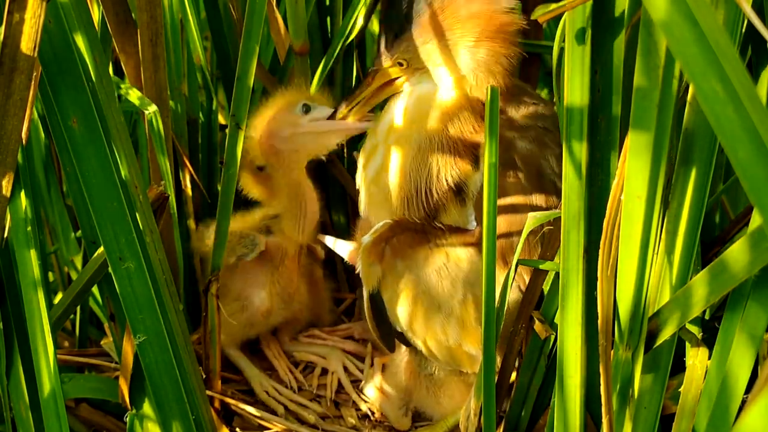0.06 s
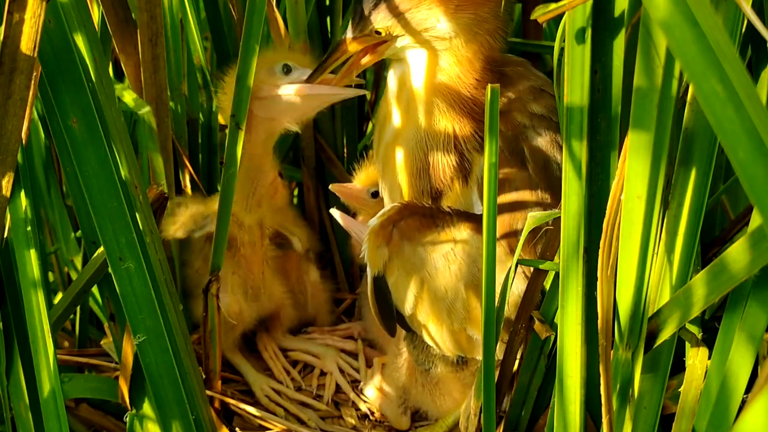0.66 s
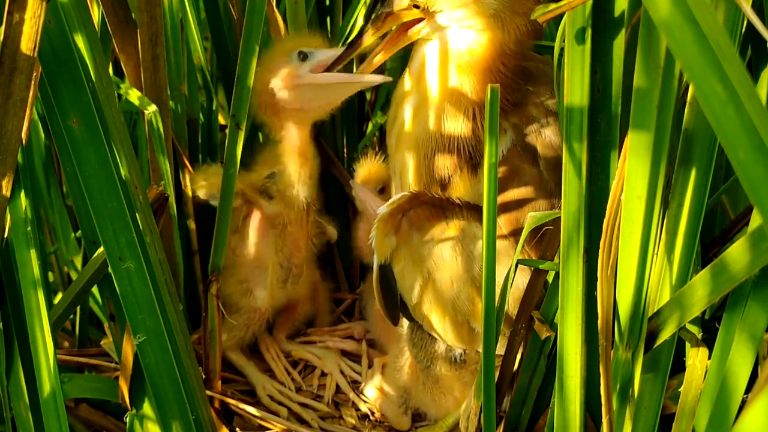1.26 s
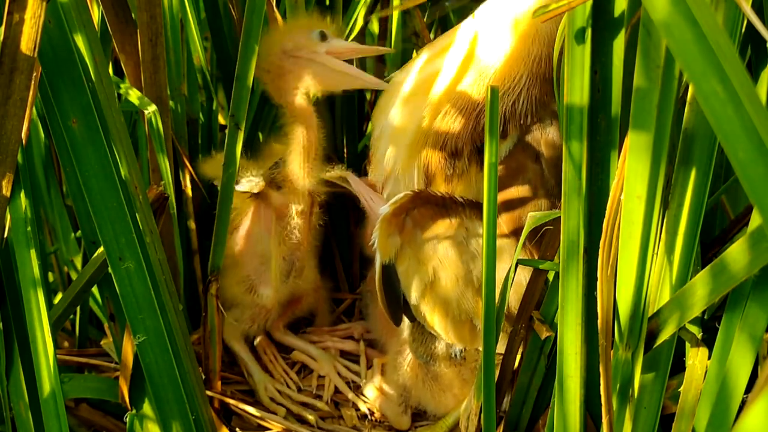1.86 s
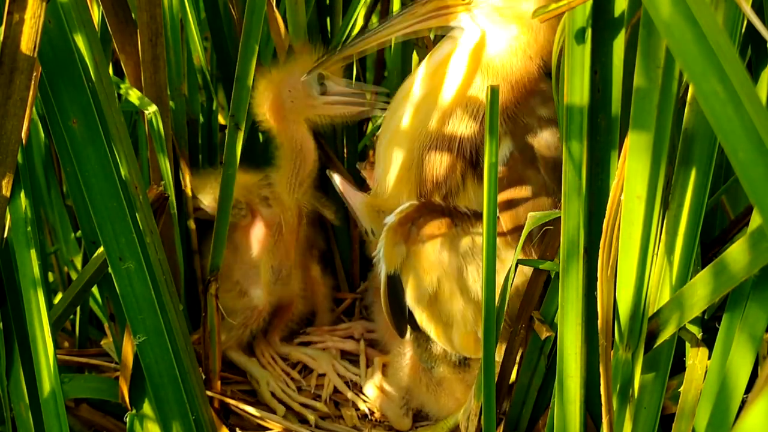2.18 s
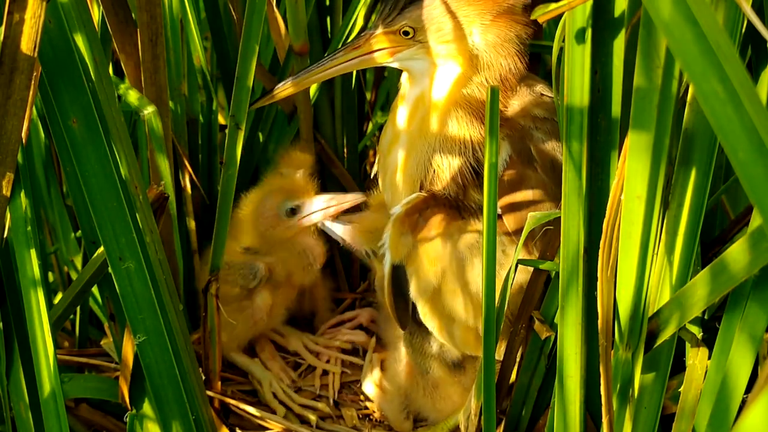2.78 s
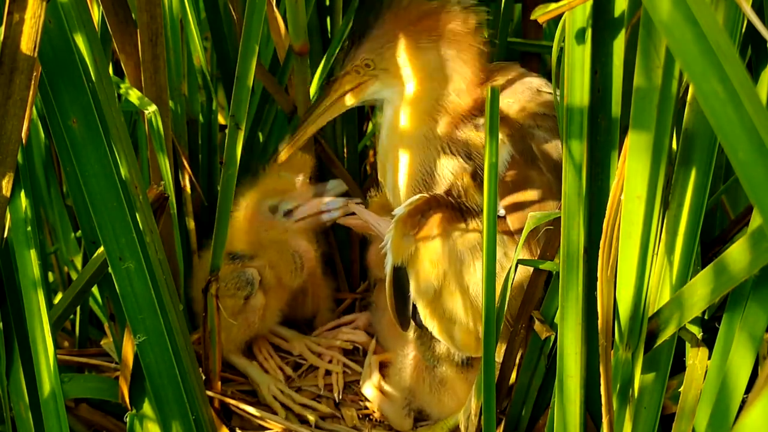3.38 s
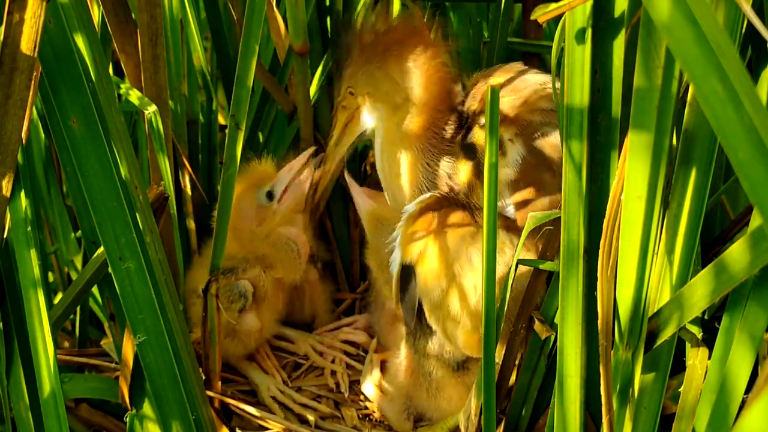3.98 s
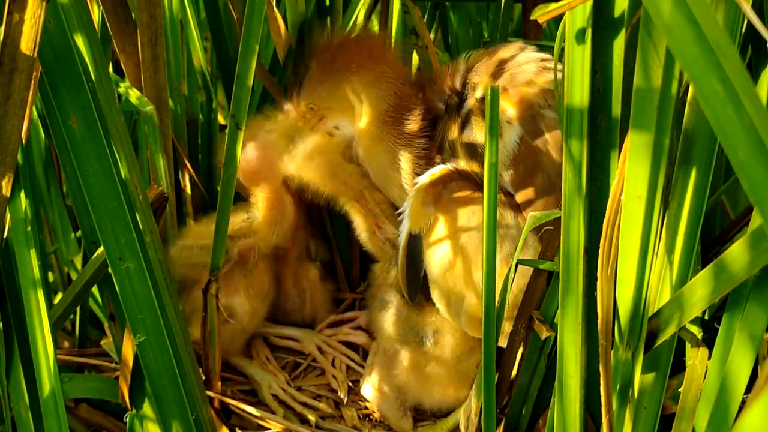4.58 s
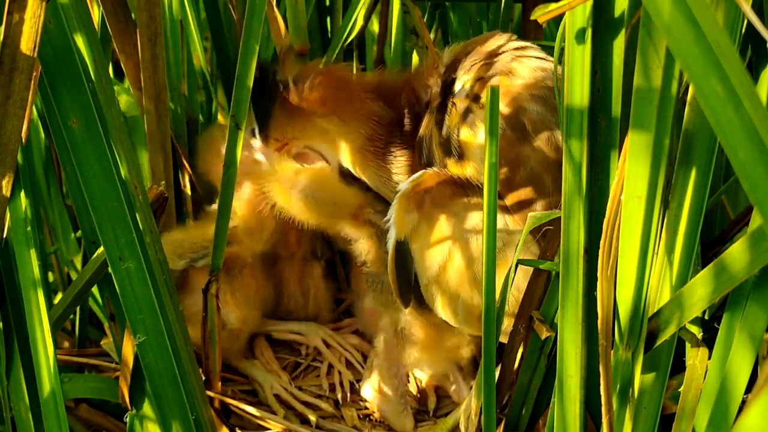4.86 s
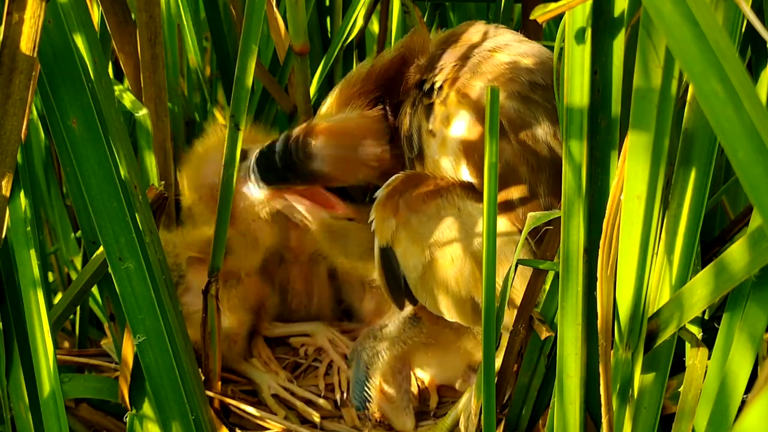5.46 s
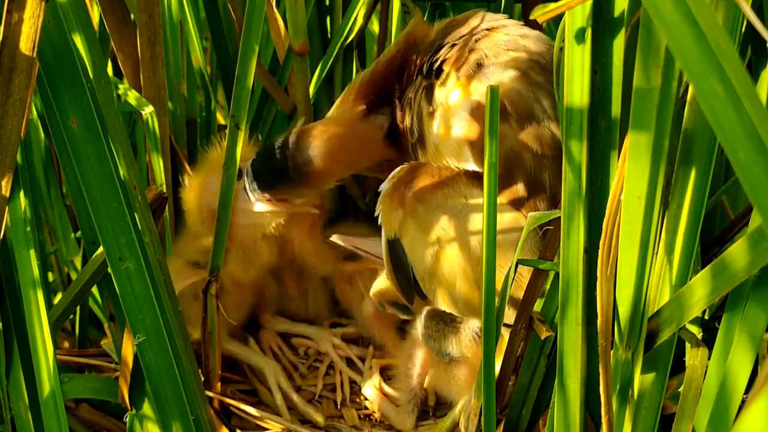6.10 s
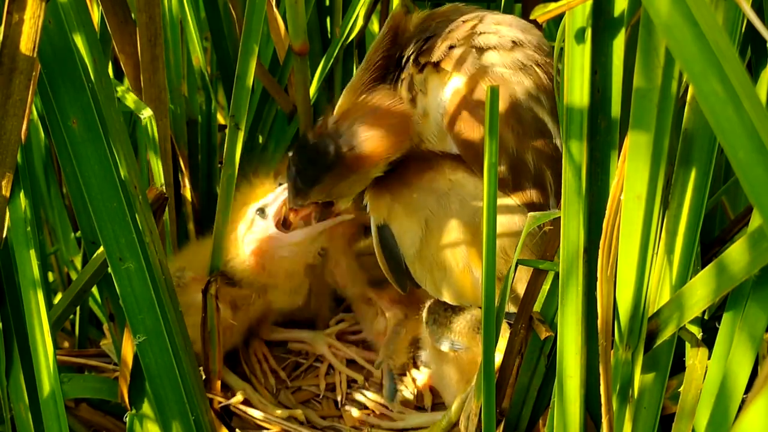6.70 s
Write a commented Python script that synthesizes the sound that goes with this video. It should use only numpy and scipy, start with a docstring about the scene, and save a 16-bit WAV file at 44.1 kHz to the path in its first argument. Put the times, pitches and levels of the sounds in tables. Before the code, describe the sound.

Heron chicks fidget in a nest near the microphone, making light scrapes and crackles of dry reed under a thin, steady insect whine and distant twittering. After a few quiet seconds one chick gives a sharp, wavering peep, the loudest sound. Hoarse wheezes and squeaks then build into long buzzing rasps with a shaky whistle in them. The outdoor air is calm, and the reeds softly scatter the calls.

```python
"""Heron chicks in a reed bed

Close by, chicks beg at the nest: hoarse wheezes, one clear peep, then long rasps from the syrinx.
Stems and feathers rustle as they shift. Insects whine near 8 kHz, one rubbing out quick chirps, and
small birds whistle far off over a low rumble. Reeds scatter the calls between two spaced microphones."""
import sys
import numpy as np
from scipy import signal
from scipy.fft import rfft, irfft, next_fast_len
from scipy.io import wavfile
from scipy.ndimage import map_coordinates

SR = 44100
rng = np.random.default_rng(int(sys.argv[2]) if len(sys.argv) > 2 else 0)


def pcm_store(signal):
    """Save signal as 16-bit PCM."""
    levels = np.round(np.clip(np.atleast_2d(signal), -1, 1) * 32767)
    wavfile.write(sys.argv[1], SR, levels.astype(np.int16).T)


N = 296793


def amp(db):
    """Decibels to gain."""
    return 10 ** (np.asarray(db) / 20)


def unit(x):
    """Scale to rms 1."""
    return x / np.sqrt(np.mean(x ** 2) + 1e-20)


def along(points, hz):
    """Read (freq_hz, value) points on a log frequency axis."""
    freqs, values = np.transpose(points)
    return np.interp(np.log(hz + 1), np.log(freqs + 1), values)


def wobble(rate, size=N):
    """A smooth random curve, rate knots a second."""
    knots = rng.standard_normal(int(size * rate / SR) + 4)
    return map_coordinates(knots, [np.arange(size) * rate / SR])


def filtered(x, response):
    """Pass x through a frequency response."""
    size = x.shape[-1]
    padded = next_fast_len(size + 8192)
    return irfft(rfft(x, padded) * response(np.fft.rfftfreq(padded, 1 / SR)), padded)[..., :size]


def noise(spectrum, size=N):
    """Two unrelated noises of rms 1, silent outside the spectrum's range."""
    inside = lambda hz: (hz > spectrum[0][0]) & (hz < spectrum[-1][0])
    white = rng.standard_normal((2, size))
    return unit(filtered(white, lambda hz: amp(along(spectrum, hz)) * inside(hz)))


def resonate(x, spectrum):
    """Colour x with a spectrum, silent below its first point, at rms 1."""
    return unit(filtered(x, lambda hz: amp(along(spectrum, hz)) * (hz > spectrum[0][0])))


def uneven(sound, depth_db):
    """Chance resonances: every contact or call gets peaks and dips of its own."""
    knots_hz = np.geomspace(300, 16000, 55)
    ripple = np.column_stack([knots_hz, depth_db * rng.standard_normal(len(knots_hz))])
    return unit(filtered(sound, lambda hz: amp(along(ripple, hz))))


def sine(hz):
    """A tone that follows a pitch curve."""
    return np.sqrt(2) * np.sin(2 * np.pi * np.cumsum(hz) / SR)


def burst(length, rise, fall):
    """An envelope that swells, holds until length seconds and dies away."""
    t = np.arange(int((length + 6 * fall) * SR)) / SR
    return np.sin(np.pi / 2 * np.minimum(t / rise, 1)) ** 2 * np.exp(-np.maximum(t - length, 0) / fall)


def add(track, start_s, x):
    """Mix x into the track at start_s."""
    start = round(start_s * SR)
    x = x[..., max(-start, 0):max(N - start, 0)]
    track[..., max(start, 0):max(start, 0) + x.shape[-1]] += x


def rightward(x, db):
    """Make x db louder at the right microphone than at the left."""
    return x * amp([[-db / 2], [db / 2]])


def reeds(x, wet_db, t60):
    """The direct sound plus its scatter from the stems, different at each microphone."""
    t = np.arange(SR // 2) / SR
    tail = rng.standard_normal((2, len(t))) * amp(-60 * t / t60) * np.minimum(t / .004, 1)
    scatter = signal.fftconvolve(np.atleast_2d(x), tail / np.linalg.norm(tail[0]), axes=1)[:, :N]
    return (x + amp(wet_db) * scatter) / np.sqrt(1 + amp(wet_db) ** 2)


# Open air over the reed bed: freq_hz, level_db
AIR_SPECTRUM = [(15, -9.5), (35, -2), (75, 0.5), (150, -6), (260, -14.5), (420, -22.5), (800, -22.5),
                (1380, -16.5), (2000, -32), (3500, -26.5), (7000, -43.5), (15800, -47)]
# How alike that air is at the two microphones: freq_hz, correlation
MIC_LIKENESS = [(60, 0.99), (300, .55), (1000, 0.1), (3000, 0.036)]


def air():
    """Low outdoor rumble that swells unevenly, and the faint patchy hiss of leaves."""
    width = lambda hz: np.arccos(np.clip(along(MIC_LIKENESS, hz), -1, 1)) / 2
    mid, side = filtered(noise(AIR_SPECTRUM), lambda hz: np.array([np.cos(width(hz)), np.sin(width(hz))]))
    rumble = amp(-80 + 1.25 * wobble(4.7)) * unit(np.array([mid + side, mid - side]))
    leaf_spectrum = [(2000, -9), (2700, -.5), (5200, 0), (7000, -8.5), (9500, -31), (15800, -29.5)]
    leaves = amp(-90 + 1.2 * wobble(4.9)) * noise(leaf_spectrum)
    return rightward(rumble, db=7) + rightward(leaves, db=5)


# Two insects off to the right: time_s, whine_db, trill_db
INSECT_LEVELS = [(0, -69, -67), (1.8, -70, -69), (2.3, -68.5, -79), (2.7, -69.5, -72.5), (3.5, -68, -68.5),
                 (4.5, -67, -67), (4.8, -68, -89.5), (6.73, -65, -72.5)]
# The lower one's whine: freq_hz, level_db
WHINE_SPECTRUM = [(7200, -41), (7560, -22), (7660, 0.5), (7720, -7.5), (7830, 4), (7900, 3), (8000, -2.5),
                  (8130, -1), (8250, -21.5), (8450, -26), (8900, -63)]
# The higher one's trill: freq_hz, level_db
TRILL_SPECTRUM = [(7900, -20.5), (8080, 1), (8200, 2), (8360, 0), (8460, -20), (8850, -38.5)]


def whining_insects():
    """Two unbroken stridulations, each a narrow band of noise that wavers in level."""
    times, whine_db, trill_db = np.transpose(INSECT_LEVELS)
    t = np.arange(N) / SR
    whine = amp(np.interp(t, times, whine_db) + 2.2 * wobble(40)) * noise(WHINE_SPECTRUM)
    trill = amp(np.interp(t, times, trill_db) + .99 * wobble(30)) * noise(TRILL_SPECTRUM)
    return rightward(whine + trill, db=10.5)


# The ring of an insect's wing: freq_hz, level_db
WING_SPECTRUM = [(7900, -50.5), (8150, -5), (8300, -5), (8400, 16.5), (8520, -7.5), (8640, -35),
                 (8780, -41), (9200, -62)]
# The four wing strokes of one chirp: relative_db
WING_STROKES = [-2, -1.5, -1.5, -2]


def chirping_insect():
    """Hard right, tooth strikes ring a wing in chirps that slow a little each time, then stop."""
    first_s, chirp_gap_s, slowing_s, stroke_gap_s = -.0265, .06203, .000155, .00986
    strokes = np.zeros(N)
    for chirp in range(30):
        start_s = first_s + chirp * (chirp_gap_s + slowing_s * chirp / 2)
        for k, db in enumerate(WING_STROKES):
            stroke = amp(db + rng.normal(0, .8)) * burst(.006, rise=.0039, fall=.004)
            add(strokes, start_s + k * stroke_gap_s, stroke)
    ring = signal.hilbert(noise(WING_SPECTRUM))
    ring = unit(ring.real / np.sqrt(np.abs(ring) ** 2 + .18))  # even strikes: steadier than hiss
    return rightward(amp(-61) * strokes * ring, db=22)


# A dry stem scraped at close range: freq_hz, level_db
STEM_SPECTRUM = [(300, -32), (800, -26), (1300, -2.5), (1700, 7), (2500, 1), (5000, -3.5), (7000, -4.5),
                 (9500, -14.5), (15800, -24)]


def scrape(length, tilt):
    """One grainy contact with a dry stem; harder ones tilt brighter, in dB per octave."""
    shape = burst(length, rise=.01, fall=.009)
    colour = [(hz, db + tilt * np.log2(hz)) for hz, db in STEM_SPECTRUM]
    grain = amp(3.6 * wobble(445, len(shape)) + 3.04 * wobble(70, len(shape)))
    return shape * uneven(grain * noise(colour, len(shape))[0], depth_db=4)


# Louder scrapes and bill knocks at the nest: start_s, length_s, level_db, tilt_db_per_octave, right_db
NEST_CONTACTS = [(0.013, 0.0087, -62, 0, 5), (0.156, 0.028, -66.5, -2, -0.5),
                 (0.393, 0.018, -70.5, -11.5, 5), (0.746, 0.016, -59, 0, 5.5), (0.803, 0.029, -61, -3.5, 5),
                 (1.268, 0.027, -63, -1, 4.5), (1.635, 0.027, -55.5, 1, 5),
                 (1.927, 0.031, -69.5, -2.5, 5.5), (2.325, 0.014, -61.5, -5.5, 2),
                 (2.629, 0.062, -65.5, 2, 3), (2.721, 0.063, -66, 3.5, 5), (3.077, 0.039, -71, -3, 5.5),
                 (3.759, 0.027, -58.5, -4.5, 4.5), (4.693, .03, -60, 11.5, 4.5),
                 (6.168, 0.026, -52, 15.5, -0.5), (6.64, 0.0088, -52.5, 7.5, 4.5)]


def rustles():
    """Dry stems knock and scrape as the chicks shift, with lighter fidgets before the rasps begin."""
    fidget_db, fidget_until_s = -79, 4.2
    scrapes = np.zeros((2, N))
    for start_s, length, db, tilt, right_db in NEST_CONTACTS:
        add(scrapes, start_s, rightward(amp(db) * scrape(length, tilt), right_db))
    for when, strength, hardness in rng.random(size=(12, 3)):
        touch = amp(fidget_db + 7.6 * strength) * scrape(.014, tilt=11 * hardness - 10.5)
        add(scrapes, when * fidget_until_s, rightward(touch, db=4.5))
    return reeds(scrapes, wet_db=-4.5, t60=.31)


def note(length, pitches, db):
    """One glide through three pitches; the steeper a high note slides, the harder it warbles."""
    progress = np.linspace(0, 1, int(length * SR))
    size = len(progress)
    hz = np.polyval(np.polyfit([0, .5, 1], pitches, 2), progress)
    steepness = min(abs(np.log(pitches[-1] / pitches[0])) / length, 6)
    warble_depth = .005 + .006 * steepness * (hz > 2000)
    quaver = 1 + warble_depth * wobble(300, size) + .005 * wobble(35, size)
    tremor_db = 2.5 * wobble(90, size)
    return amp(db + tremor_db) * signal.windows.tukey(size) * sine(hz * quaver)


# The clearest notes from far off in the reeds: start_s, length_s, start_hz, end_hz, level_db
FAR_NOTES = [(.096, 0.049, 5560, 5780, -69), (.135, .11, 6470, 5000, -68.5),
             (0.147, 0.029, 3030, 2795, -68.5), (0.246, .082, 4320, 3136, -71.5),
             (0.432, .17, 7020, 5640, -68.5), (0.588, 0.095, 5930, 4900, -68.5),
             (0.621, 0.067, 3200, 3410, -75.5), (1.005, 0.11, 2625, 2770, -80),
             (1.034, 0.097, 4570, 6280, -69), (1.118, .06, 5720, 5150, -64.5),
             (1.181, 0.083, 5770, 6420, -66), (1.291, 0.085, 6640, 5520, -67.5),
             (1.366, 0.067, 5450, 2870, -66), (1.468, 0.13, 2734, 2627, -80),
             (1.632, 0.058, 5050, 5340, -65.5), (1.72, 0.041, 5950, 3910, -63.5),
             (1.835, 0.047, 3670, 3970, -78.5), (2.076, 0.039, 5720, 5680, -65.5),
             (2.123, .069, 6570, 5350, -69), (2.193, .07, 4800, 2766, -67), (2.208, 0.091, 6370, 4550, -72),
             (2.422, .06, 2660, 2893, -73), (2.501, 0.12, 6430, 4850, -71),
             (2.686, 0.065, 4800, 5390, -66.5), (2.904, 0.098, 5250, 3420, -77.5),
             (3.016, 0.14, 4700, 3900, -79), (3.095, 0.27, 2600, 2330, -82), (3.207, 0.14, 3600, 4400, -81),
             (3.484, 0.071, 6520, 4730, -72), (3.609, 0.069, 2550, 2700, -77.5),
             (3.855, 0.016, 5340, 4120, -68), (4.131, 0.02, 5840, 4280, -61.5),
             (5.777, 0.07, 3470, 3090, -71.5)]


def far_birds():
    """Whistled glides smeared by the reeds, a fainter twitter that dies down, and one low rising whoop."""
    bend = .6  # share of a glide done by its middle
    twitter_db, fade_db_per_s, twitter_notes = -73.5, 3, 150
    song, twitter, whoop = np.zeros((3, N))
    for start_s, length, start_hz, end_hz, db in FAR_NOTES:
        middle_hz = start_hz + bend * (end_hz - start_hz)
        add(song, start_s, note(length, [start_hz, middle_hz, end_hz], db))
    for k, (when, height, slide, size) in enumerate(rng.random(size=(twitter_notes, 4))):
        start_s = (k + when) / twitter_notes * N / SR
        hz = 3200 + 2700 * height
        fall = .32 * slide - .1  # most notes slide down
        pitches = [hz * (1 + fall), hz, hz * (1 - fall)]
        add(twitter, start_s, note(.03 + .05 * size, pitches, twitter_db - fade_db_per_s * start_s))
    add(whoop, 2.912, note(.043, [540, 820, 1400], db=-66))
    song = reeds(song, wet_db=2.5, t60=.38)
    twitter = reeds(twitter, wet_db=2.5, t60=.17)
    whoop = reeds(whoop, wet_db=-3, t60=.3)
    return rightward(song + twitter + whoop, db=8.5)


# The birds treading and leaning on the nest, a parent among them from 4.6 s: start_s, length_s, level_db
FOOTFALLS = [(0.869, 0.06, -78), (1.319, 0.039, -75.5), (2.09, 0.027, -81), (2.42, 0.033, -78),
             (2.612, 0.028, -66), (2.748, 0.044, -75), (4.645, 0.11, -61.5), (5.061, 0.72, -72),
             (6.046, 0.62, -71), (6.65, .1, -69.5)]


def crackle():
    """Dry nest material snaps underfoot in many tiny clicks of very unequal size."""
    clicks_per_s = 350
    load = np.zeros(N)
    for start_s, length, db in FOOTFALLS:
        add(load, start_s, amp(db) * burst(length, rise=.031, fall=.064))
    clicks = (rng.random(N) < clicks_per_s / SR) * amp(12 * np.minimum(rng.standard_normal(N), 2))
    dry_reed = [(1200, -51), (2500, -6), (5000, -3.5), (7000, -3.5), (9000, -12.5), (12000, -4.5),
                (15800, -3.5)]
    snaps = load * amp(1.3 * wobble(15)) * resonate(clicks, dry_reed)
    return rightward(reeds(snaps, wet_db=13.5, t60=.1), db=1)


# Wings and bodies bumping in the nest: start_s, length_s, centre_hz, level_db
FEATHER_PUFFS = [(1.42, 0.096, 217, -76.5), (1.632, 0.015, 880, -73), (1.736, 0.049, 223, -73),
                 (1.882, 0.094, 200, -76), (2.332, .11, 338, -81.5), (2.621, 0.053, 232, -82.5),
                 (3.473, 0.092, 240, -76.5), (3.744, 0.04, 230, -74), (4.485, 0.17, 386, -70.5),
                 (4.581, 0.049, 381, -61), (5.081, 0.16, 93, -74), (5.546, .12, 338, -83.5),
                 (6.039, 0.063, 328, -86), (6.19, 0.02, 530, -80.5)]


def feathers():
    """Ruffled feathers push soft, low puffs of air."""
    puffs = np.zeros(N)
    for start_s, length, hz, db in FEATHER_PUFFS:
        shape = burst(length, rise=.006, fall=.028)
        colour = [(hz / 3, -22), (hz / 1.11, -4), (hz, 0), (hz * 1.105, -6), (hz * 1.6, -22)]
        add(puffs, start_s, amp(db) * shape * noise(colour, len(shape))[0])
    return rightward(reeds(puffs, wet_db=-11, t60=.21), db=8)


# Wheezes from the nest: start_s, length_s, level_db, tilt_db_per_octave
WHEEZE_CALLS = [(3.346, .09, -64.5, -2.5), (3.919, 0.12, -65, -6.5), (4.202, 0.085, -61, -7),
                (4.299, 0.15, -57, 6.5), (4.448, 0.13, -51.5, 9), (4.643, .12, -53, 4.5),
                (5.013, .13, -55, 8), (5.858, .12, -56, 0), (6.643, 0.15, -53, 6)]
# Resonances of the open bill: freq_hz, level_db
BILL_SPECTRUM = [(1500, -38), (2100, -17.5), (2480, 8), (2950, 6.5), (3380, -9), (3720, 6.5), (4500, 1.5),
                 (4850, 9.5), (5350, 6), (5750, 2.5), (7000, -2), (7500, -21), (9500, -22), (14000, -72.5)]
# Squeaks within the wheezes: start_s, length_s, pitch_hz, swing_hz, warble_hz, level_db
SQUEAK_CALLS = [(4.203, 0.051, 6340, 79, 19, -58.5), (4.246, 0.027, 4980, 496, 28, -59),
                (4.369, 0.05, 3614, 1144, 39.5, -56), (4.399, 0.065, 2027, 127, 12.84, -63.5),
                (4.526, 0.068, 3332, 903, 27, -56.5)]


def wheezes():
    """Hoarse, voiceless calls through an open bill, some breaking into a warbled squeak."""
    hiss, squeaks = np.zeros((2, N)), np.zeros(N)
    for start_s, length, db, tilt in WHEEZE_CALLS:
        colour = [(hz, level + tilt * np.log2(hz)) for hz, level in BILL_SPECTRUM]
        shape = burst(length, rise=.031, fall=.022)
        gain = amp(db + .78 * wobble(109.5, len(shape))) * shape
        add(hiss, start_s, gain * uneven(noise(colour, len(shape)), depth_db=3))
    for start_s, length, hz, swing_hz, warble_hz, db in SQUEAK_CALLS:
        t = np.arange(int(length * SR)) / SR
        pitch = hz + swing_hz * np.sin(2 * np.pi * warble_hz * t) + 110 * wobble(943, len(t))
        add(squeaks, start_s, amp(db) * signal.windows.tukey(len(t)) * sine(pitch))
    return rightward(reeds(hiss, wet_db=-5.5, t60=.25) + reeds(squeaks, wet_db=-2, t60=.35), db=7.5)


# Three slides of one close peep: start_s, length_s, top_hz, bottom_hz, crest_fraction, level_db
PEEP_SLIDES = [(3.921, 0.048, 6510, 5980, 0.89, -29), (3.963, 0.05, 6667, 5700, 0.16, -31),
               (4.005, 0.044, 6980, 5790, 0.42, -32)]


def peep():
    """A whistle that slides down and flips back up twice, beating against its own scatter."""
    swell_db = 16  # lost per slide length away from the crest
    voice = np.zeros(N)
    for start_s, length, top_hz, bottom_hz, crest, db in PEEP_SLIDES:
        progress = np.linspace(0, 1, int(length * SR))
        hz = top_hz + (bottom_hz - top_hz) * np.sin(np.pi / 2 * progress) ** 2
        hz *= 1 + .005 * wobble(500, len(hz))
        shape = amp(db - swell_db * abs(progress - crest)) * signal.windows.tukey(len(hz), .15)
        add(voice, start_s, shape * (sine(hz) + amp(-50) * sine(2 * hz)))
    return rightward(reeds(voice, wet_db=.5, t60=.13), db=5.5)


# Close begging rasps: start_s, length_s, crest_after_s, buzz_db, whistle_db (before a 2.5 dB trim),
# crest_roughness
BEGGING_CALLS = [(4.455, 0.063, 0.036, -57.5, -56, 0.86), (4.755, .195, .085, -49.5, -53.5, 0.61),
                 (5.134, .605, .57, -45, -38.5, 0.61), (5.972, 0.56, .32, -44.5, -35.5, .3)]


def effort():
    """Each rasp swells and clears up to its crest of effort, then fades."""
    onset_rough, buzz_db_per_s, whistle_db_per_s = .9, 11, 28
    buzz_gain, whistle_gain, rough, past_crest_s = np.zeros((4, N))
    for start_s, length, crest_s, buzz_db, whistle_db, crest_rough in BEGGING_CALLS:
        shape = burst(length, rise=.053, fall=.023)
        t = np.arange(len(shape)) / SR
        add(buzz_gain, start_s, shape * amp(buzz_db - buzz_db_per_s * abs(t - crest_s)))
        add(whistle_gain, start_s, shape * amp(whistle_db - whistle_db_per_s * abs(t - crest_s)))
        add(rough, start_s, onset_rough + (crest_rough - onset_rough) * np.minimum(t / crest_s, 1) ** 2)
        add(past_crest_s, start_s, np.maximum(t - crest_s, 0))
    return buzz_gain, whistle_gain, np.clip(rough, 0, 1), past_crest_s


# Resonances of a chick's throat: freq_hz, level_db
THROAT_SPECTRUM = [(3400, -56), (4150, -25), (4500, -12), (4750, -3), (5150, -1), (5600, -1.5), (6200, -4),
                   (6700, -12), (7400, -17), (7950, -16.5), (8600, -39.5), (10000, -19), (11900, -20),
                   (12700, -45), (15800, -44)]


def rasps():
    """The syrinx buzzes in uneven pulses through the throat; with effort a shaky whistle rises out."""
    buzz_gain, whistle_gain, rough, past_crest_s = effort()
    pulse_hz = 441 - 95 * past_crest_s  # both pitches sag after the crest
    whistle_hz = 6183 - 200 * past_crest_s
    flutter = unit(amp(wobble(25) + 1.6 * wobble(85) + 1.2 * wobble(450)))
    jitter = 1 + rough * (.018 * wobble(40) + .028 * wobble(400))
    cycles = np.cumsum(pulse_hz * jitter) / SR
    pulses = np.exp(-((cycles % 1 - .5) / .012) ** 2)
    buzz = unit(reeds(resonate(pulses, THROAT_SPECTRUM), wet_db=1, t60=.15))
    voice = np.sqrt(1 - rough ** 2) * buzz + rough * noise(THROAT_SPECTRUM)
    shake = 1 + .012 * wobble(110) + .022 * wobble(1300)
    whistle = amp(-2.5) * whistle_gain * sine(whistle_hz * shake)
    whistle = reeds(flutter * whistle, wet_db=7, t60=.078)
    return rightward(flutter * buzz_gain * voice, db=7) + rightward(whistle, db=4.5)


# How far the nest's sound lags at the left microphone: freq_hz, lag_rad
LEFT_MIC_LAG = [(60, .05), (370, 1.13), (1500, 1.25), (6000, 1.49)]


def scene():
    """The nest lies close by, nearer the right microphone; insects and birds are all around it."""
    nest = peep() + rasps() + wheezes() + rustles() + feathers() + crackle()
    nest = filtered(nest, lambda hz: np.exp(.5j * along(LEFT_MIC_LAG, hz) * np.array([[-1], [1]])))
    return nest + far_birds() + whining_insects() + chirping_insect() + air()


def record(dry):
    """The camera keeps nothing above its band limit."""
    return filtered(dry, lambda hz: hz < 15800)


dry = scene()
out = record(dry)
pcm_store(out)
```